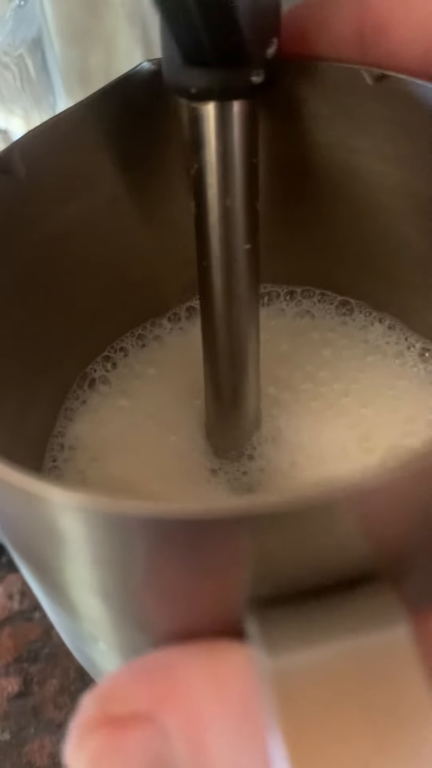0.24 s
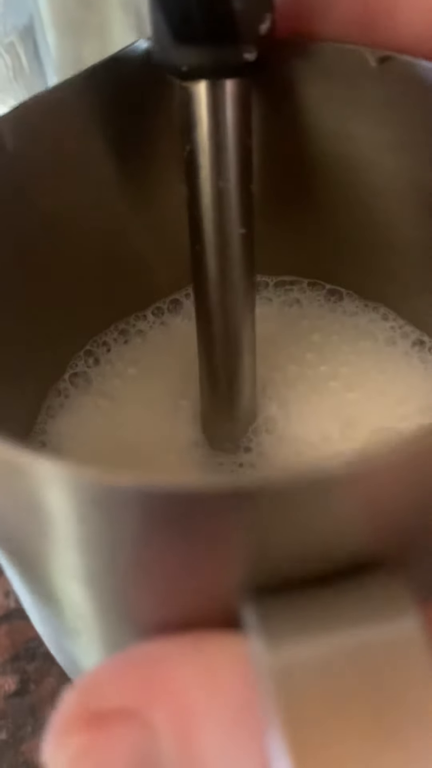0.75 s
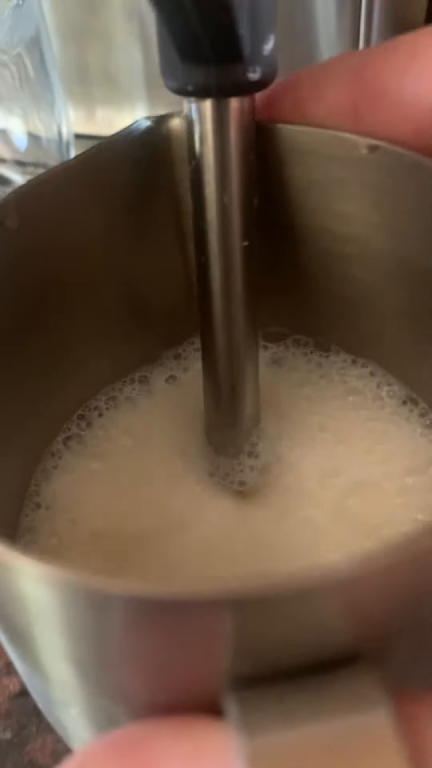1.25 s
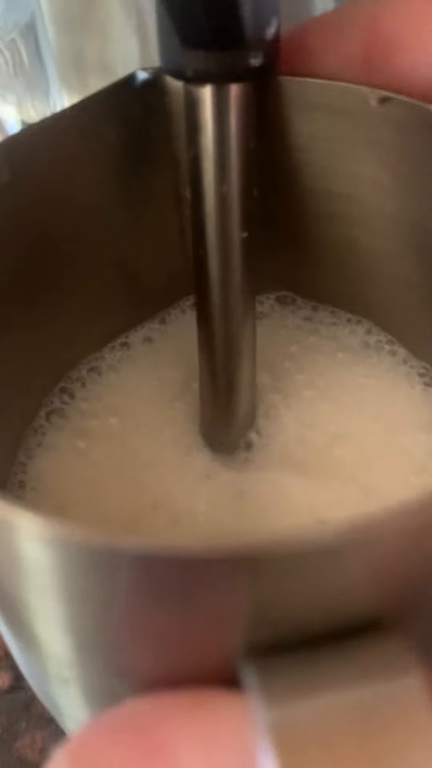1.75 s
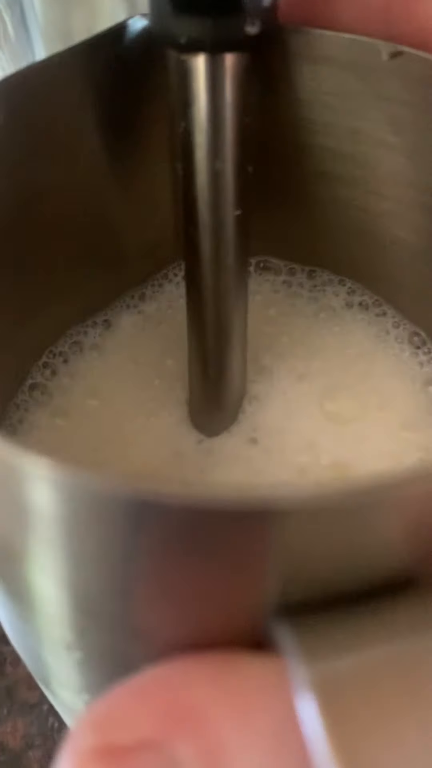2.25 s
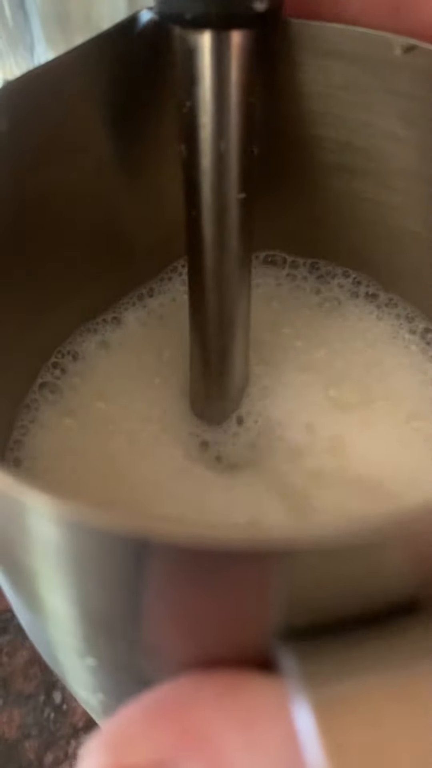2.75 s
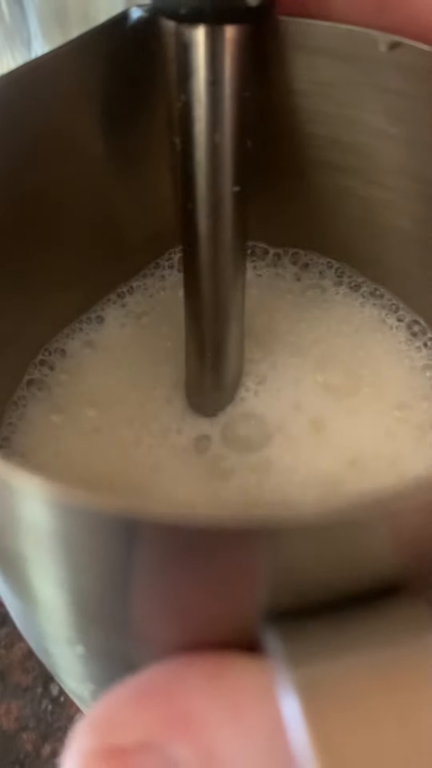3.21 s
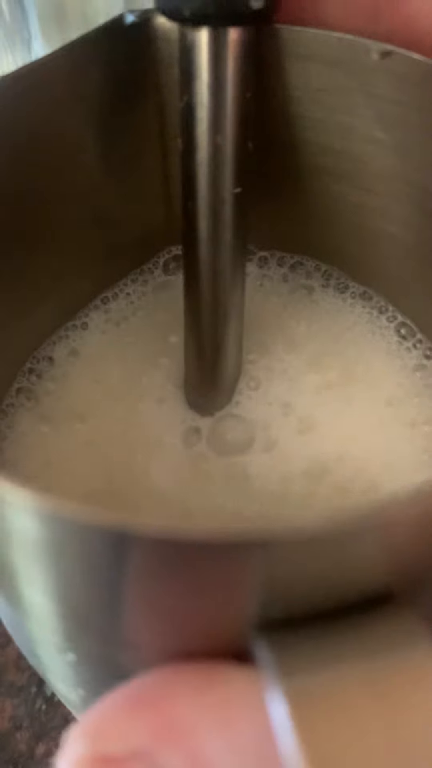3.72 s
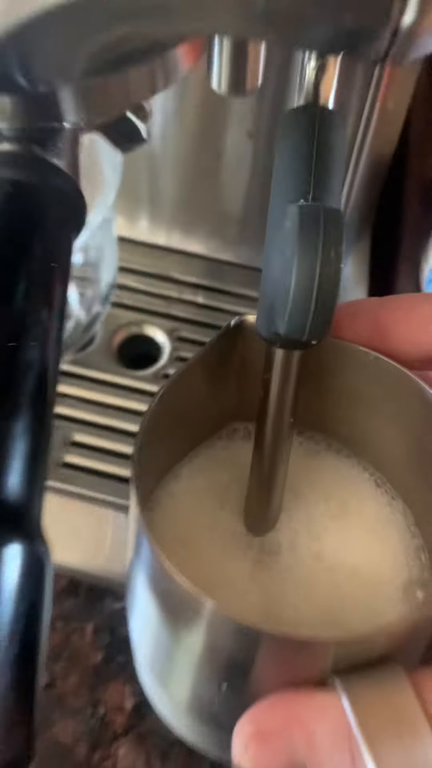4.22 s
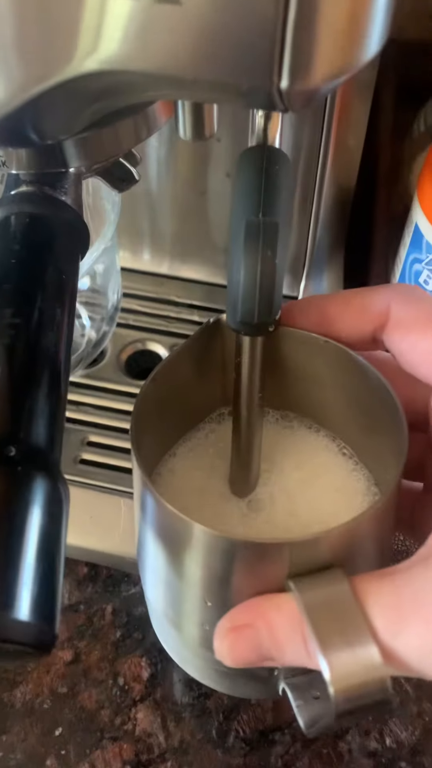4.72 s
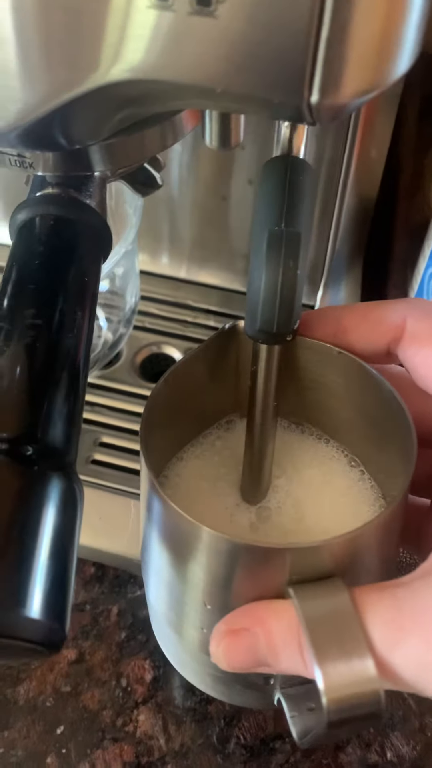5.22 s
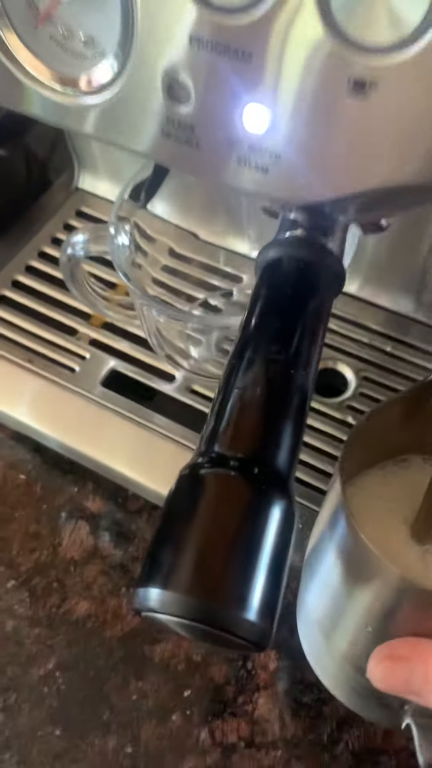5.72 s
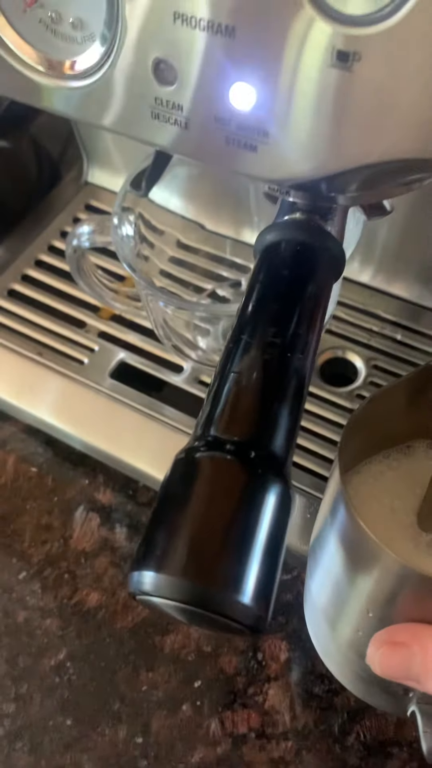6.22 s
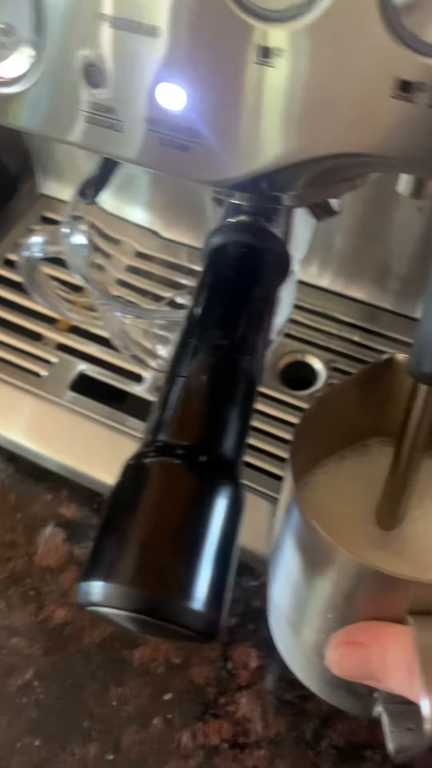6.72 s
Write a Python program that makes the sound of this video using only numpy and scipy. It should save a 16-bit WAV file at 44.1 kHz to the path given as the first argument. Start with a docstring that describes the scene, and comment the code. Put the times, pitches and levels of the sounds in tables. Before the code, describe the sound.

Very close over a steel jug, steam hisses into milk. Harsh, bright tearing bursts come in the first second and a half, with hollow churning, bubble pops and low gulps. A calmer simmer follows, then another rip just before three seconds. Around four seconds the microphone pulls back into the small kitchen; the hiss thins and wavers, while the machine's pump thuds about twice a second.

```python
"""A steam wand froths milk in a steel jug: random clicks ring the jug's colours and noise makes the hiss.
When the tip breaks the surface, bright noise tears in air; tones that slide and die are pops and gulps.
Tiny clicks fizz over the foam, while decaying modes make the machine's pump thump about twice a second.
At about four seconds the microphone draws back from the jug: near colours fade to far ones, the room grows."""
import sys
import numpy as np
from scipy import signal
from scipy.fft import rfft, irfft, next_fast_len
from scipy.io import wavfile
from scipy.ndimage import uniform_filter1d

SR = 44100
rng = np.random.default_rng(int(sys.argv[2]) if len(sys.argv) > 2 else 0)


def store_wav(level_fs):
    """Save 16-bit WAV to argv[1]."""
    pcm = np.round(np.clip(np.atleast_2d(level_fs), -1, 1) * 32767)
    wavfile.write(sys.argv[1], SR, pcm.T.astype(np.int16))


N = 306759
TIME = np.arange(N) / SR

# the tip breaks or skims the surface: (start [s], length [s], build-up [s], tearing air [dB],
# churning [dB], brightness [dB per octave], sag of the milk's ring [octaves])
SURFACE_BREAKS = [(0.015, 0.014, 0.029, -31, -28.5, 5, 0), (0.053, 0.335, .02, -46, -47, -9.5, 0.0026),
                  (0.413, .078, 0.012, -24, -20, 5, 0.0036), (0.501, 0.17, .03, -28.5, -20.5, 10, 0.012),
                  (0.881, 0.13, 0.043, -51.5, -50, -5.5, 0),
                  (1.211, 0.07, 0.082, -21.5, -15.5, 15.5, 0.025),
                  (1.285, .02, .02, -42, -21.5, 10, 0.0037), (1.35, 0.02, 0.02, -31.5, -21.5, 10, 0.0033),
                  (1.385, 0.112, 0.04, -19.5, -15.5, 10.5, 0.18), (2.418, 0.12, .06, -60, -45, -26, 0.0017),
                  (2.782, 0.115, 0.1, -24, -12, -3.5, 0.14)]
# steady jet under the foam: (time [s], hiss level [dB])
JET_LEVEL = [(0, -44.5), (.4, -47), (.8, -48.5), (1.2, -38), (1.66, -45.5), (2.26, -52), (2.45, -46),
             (2.96, -47.5), (3.3, -47), (4.08, -46), (4.48, -58), (4.88, -49.5), (5.08, -57.5),
             (5.42, -50.5), (5.78, -59), (6, -51.5), (6.38, -59), (6.8, -51), (6.94, -56.5)]
# microphone position: (time [s], distance [0 over the jug to 1 drawn back])
MIC_AWAY = [(0, 0.039), (3.85, 0.074), (4.3, 0.87), (6.96, 1)]
# colour of wildly churning milk: (frequency [Hz], density [dB per Hz])
BOIL_COLOUR = [(30, -61), (100, -35.5), (180, -30), (260, -5), (400, -14), (510, -20), (660, -0.5),
               (850, 3), (1200, 0), (1550, -9), (2300, -21), (5000, -52)]

# the milk and the air heave up by this much over a break's build-up time
BUILD_UP_DB, TEAR_OPEN_DB_PER_S = 9.5, 1492.5
# the pump fires short runs of mains-rate strokes; no two runs are quite alike
MAINS_HZ, PUMP_RUNS_S = 60, np.arange(.2475, TIME[-1], .5166)
PUMP_DETUNE, PUMP_UNEVEN_DB = .025, 1.6  # random spread: share of pitch, level


def amp(db):
    """Decibels to gain."""
    return 10 ** (np.asarray(db) / 20)


def unit(x):
    """Scales to rms 1."""
    return x / np.sqrt(np.mean(x ** 2) + 1e-20)


def read(points, hz, axis=1):
    """One column of a table, on a log-frequency axis."""
    columns = np.transpose(points)
    return np.interp(np.log(hz + 1), np.log(columns[0] + 1), columns[axis])


def curve(rows, axis=1):
    """One column of a table, at every sample."""
    columns = np.transpose(rows)
    return np.interp(TIME, columns[0], columns[axis])


def add(mix, s, sound):
    """Mixes a sound in at s seconds."""
    part = mix[max(round(s * SR), 0):][:len(sound)]
    part += sound[:len(part)]


def colour(x, spectrum, size=4096):
    """Minimum-phase filter of energy 1: each click rings causally with the spectrum."""
    log_gain = np.log(amp(read(spectrum, abs(np.fft.fftfreq(size, 1 / SR)))))
    ring = np.fft.ifft(np.exp(np.conj(signal.hilbert(log_gain)))).real[:size // 2]
    return signal.oaconvolve(x, ring / np.linalg.norm(ring))[:len(x)]


def flutter(rate_hz):
    """Random wavering of rms 1 around a rate."""
    size = next_fast_len(N, True)
    u = np.fft.rfftfreq(size, 1 / SR) / rate_hz
    spectrum = rfft(rng.standard_normal(size)) * u / (1 + u ** 2) ** 2
    return unit(irfft(spectrum, size)[:N])


def clicks(per_s, spread_db):
    """A random train of clicks of either sign, a few much larger than the rest where the spread is wide."""
    size = amp(spread_db * np.minimum(rng.exponential(1, N), 4))
    sign = rng.choice([-1, 1], N)
    return unit(size * sign * (rng.random(N) < per_s / SR))


def swell(start, length, rise_db_per_s, fall_db_per_s):
    """A gain that rises to 1 at start, holds and dies away, in straight lines of decibels."""
    before_db = rise_db_per_s * np.maximum(start - TIME, 0)
    after_db = fall_db_per_s * np.maximum(TIME - start - length, 0)
    return amp(-np.minimum(before_db + after_db, 200))


def patchy(x, depth_db):
    """Random patches, some 800 Hz by 30 ms, swell and fade in a hiss and shift its colour."""
    z = signal.stft(x, SR, nperseg=512)[2]
    across_pitch = uniform_filter1d(rng.standard_normal(z.shape), size=9, axis=0)
    field = unit(uniform_filter1d(across_pitch, size=5, axis=1))
    return signal.istft(z * amp(depth_db * field), SR, nperseg=512)[1][:N]


def bubble(hz, rise_s, t60, glide, size=8000):
    """A bubble swells into a tone that slides and dies; returns the tone and its envelope."""
    t = np.arange(size) / SR
    shape = (1 - np.exp(-(t / rise_s) ** 2)) * amp(-60 * t / t60)
    shape /= shape.max()
    turns = np.cumsum(hz * (1 + glide * np.minimum(t / t60, 1))) / SR
    return shape * np.sin(2 * np.pi * (turns + rng.random())), shape


def steam_db(lead_db=-3.5, sag_db_per_s=24, settle_db_per_s=322):
    """How hard the milk churns: steady steam, and a heave that builds up and jumps as the surface breaks."""
    # steam condensing under the milk: (time [s], churning level [dB])
    steady_steam = [(0, -39.5), (1.7, -39), (2.5, -31.5), (3.08, -44.5), (3.3, -33), (3.55, -37),
                    (3.9, -24), (4.18, -28.5), (4.26, -34.5), (4.7, -52.5), (4.9, -40.5), (5.1, -46),
                    (5.42, -31.5), (5.76, -47.5), (6.02, -38), (6.34, -52), (6.66, -38), (6.94, -50)]
    level = amp(curve(steady_steam))
    for start, length, build_s, air_db, churn_db, *_ in SURFACE_BREAKS:
        sag_db = sag_db_per_s * np.clip(TIME - start, 0, length)  # sags while the tear is open
        lead = amp(lead_db) * swell(start, length, BUILD_UP_DB / build_s, settle_db_per_s)
        heave = np.maximum(lead, swell(start, length, TEAR_OPEN_DB_PER_S, settle_db_per_s))
        level = np.maximum(level, amp(churn_db - sag_db) * heave)
    return 20 * np.log10(level)


def tear(start, length, build_s, air_db, shut_db_per_s=1000, spray_db=-16, spray_fade_db_per_s=258.5):
    """Gain of one break's air: the tear opens and shuts quickly, a thin spray leads up to it and lingers."""
    spray = amp(spray_db) * swell(start, length, BUILD_UP_DB / build_s, spray_fade_db_per_s)
    opened = swell(start, length, TEAR_OPEN_DB_PER_S, shut_db_per_s)
    return amp(air_db) * np.maximum(opened, spray)


def jet_db(bare_db=-13):
    """Level of the jet's fizz, louder wherever a break lays it bare; bare_db is against the tearing air."""
    bare = amp(bare_db) * sum(tear(*row[:4]) for row in SURFACE_BREAKS)
    return 20 * np.log10(np.hypot(amp(curve(JET_LEVEL)), bare))


def hollow(x, close_s=0.064):
    """The jet digs a hollow in the milk: as it grows, the sound is played slower and drops in pitch."""
    sag_oct = np.zeros(N)
    for start, length, *_, octaves in SURFACE_BREAKS:
        growth = np.clip((TIME - start) / length, 0, 1)
        closing = np.exp(-np.maximum(TIME - start - length, 0) / close_s)
        sag_oct += octaves * growth * closing
    return np.interp(np.cumsum(2 ** -sag_oct), np.arange(N), x)


def bubbles(per_s=9, cycles=16, count=24):
    """Small bubbles of many sizes, each a brief tone, born at random; per_s counts each size."""
    out = np.zeros(N)
    for hz in np.geomspace(230, 1900, count):
        tone = unit(bubble(hz, rise_s=2 / hz, t60=cycles / hz, glide=0.026)[0])
        out += signal.oaconvolve(clicks(per_s, spread_db=5.0), tone)[:N]
    return unit(out)


def churn(calm_db=1, boil_db=-1.0, far_db=1.0, tones_db=-5, clump_db=0.15, lump_db=2,
          boil_from_db=-30, boil_span_db=9):
    """Clumps of collapsing bubbles ring the jug; the ring widens and drops as the milk boils up."""
    # the jug's ring at a simmer, close by: (frequency [Hz], density [dB per Hz])
    simmer_near = [(100, -70), (190, -23.5), (255, -5), (330, -15), (420, -22), (510, -25), (620, -10),
                   (750, -8), (880, 2), (970, 2), (1130, -5), (1280, -5), (1500, -11), (2300, -18.5),
                   (5000, -75)]
    # the jug's ring heard from further off: (frequency [Hz], density [dB per Hz])
    simmer_far = [(130, -50), (260, -18), (400, -36), (540, -19), (670, -8), (770, -9), (870, 3), (990, 5),
                  (1110, -12), (1230, -6), (1480, -15), (1680, -5), (1830, -13), (2060, -11), (2500, -45)]
    level_db, away = steam_db(), curve(MIC_AWAY)
    crackle = clicks(per_s=3200, spread_db=4.0)
    tones = bubbles(per_s=55, cycles=36.0)

    def ring(jug):
        return unit(unit(colour(crackle, jug)) + amp(tones_db) * unit(colour(tones, jug)))

    clumps = unit(amp(clump_db * flutter(rate_hz=120) + lump_db * flutter(rate_hz=9.5)))
    boil = np.clip((level_db - boil_from_db) / boil_span_db, 0, 1)
    calm = (1 - boil) * amp(calm_db) * ring(simmer_near)
    wild = boil * amp(boil_db) * hollow(ring(BOIL_COLOUR))
    far = amp(far_db) * ring(simmer_far)
    return amp(level_db) * clumps * ((1 - away) * (calm + wild) + away * far)


def hiss(near_db=5, far_db=5, rim_db=1.5, flicker_db=2.0):
    """The jet under the foam fizzes as flickering noise; its treble beams out of the jug's mouth."""
    # hiss over the jug: (frequency [Hz], density [dB per Hz])
    hiss_near = [(500, -15), (1400, 6), (2000, 0), (2350, -6), (2750, 4), (3400, 1), (3900, 5), (4700, 2),
                 (5250, 0), (6100, -20), (6500, -6), (6900, -1), (7400, -11), (8200, -16), (9100, -12),
                 (10300, -24), (14000, -55)]
    # hiss from further off: (frequency [Hz], density [dB per Hz])
    hiss_far = [(500, -15), (1100, -9), (1300, 3), (1480, -1), (1680, 8), (1850, -1), (2060, 2), (2330, -7),
                (3050, 4), (3300, 4.5), (3950, 6), (4750, -8), (5300, -7), (6200, -16), (6680, -6),
                (7200, -24), (9300, -11), (14000, -70)]
    # band that brightens as the microphone crosses the jug's rim: (frequency [Hz], density [dB per Hz])
    rim_band = [(800, -51), (1700, 3), (2700, 22.5), (3500, 7), (4400, 0.5), (7000, -19.5)]
    fizz = unit(rng.standard_normal(N) + clicks(per_s=1500, spread_db=0.0))
    drive = fizz * amp(jet_db() + flicker_db * flutter(rate_hz=5.9))
    away = curve(MIC_AWAY)
    near = (1 - away) * amp(near_db) * colour(drive, hiss_near)
    far = away * amp(far_db) * colour(drive, hiss_far)
    rim = np.sin(np.pi * away) * amp(rim_db) * colour(drive, rim_band)  # strongest halfway
    return near + far + rim


def tearing(level_db=2.0, sputter_db=1.04, surge_db=2.7, pivot_hz=11000):
    """The bare jet drags air into the milk: a sputtering hiss, each break with its own brightness."""
    # torn air before each break's tilt: (frequency [Hz], density [dB per Hz])
    torn_air = [(40, -81.5), (1200, -20), (3000, -21), (3900, -7), (5000, 4), (5900, -11), (6700, 1),
                (7600, -7), (9000, 3), (10200, -4.5), (11200, -2), (13200, -4.5), (14300, -20.5),
                (15700, -9.5)]
    fizz = unit(rng.standard_normal(N) + clicks(per_s=1000, spread_db=1.5))
    jet = fizz * amp(level_db + sputter_db * flutter(rate_hz=96) + surge_db * flutter(rate_hz=14))
    out = np.zeros(N)
    for s, length, build_s, air_db, churn_db, tilt_db, sag_oct in SURFACE_BREAKS:
        # the tilt stops two octaves below the pivot
        tilted = [(hz, db + tilt_db * np.log2(max(hz / pivot_hz, 1 / 4))) for hz, db in torn_air]
        out += colour(jet * tear(s, length, build_s, air_db), tilted)
    return out


def blurts(per_s=66, over_db=4, spread_db=5.0, pitch_hz=935, spread_oct=0.22, t60=0.016,
           splash_db=-9, count=800):
    """Lesser collapses at random, stronger as the milk churns harder: rows like those of the large ones."""
    gap, size, pitch = rng.random((count, 3)).T
    times = np.cumsum((.2 + 1.6 * gap) / per_s)
    levels_db = np.interp(times, TIME, steam_db()) + over_db + spread_db * (2 * size - 1)
    pitches_hz = pitch_hz * 2 ** (spread_oct * (2 * pitch - 1))
    rows = zip(times, levels_db, pitches_hz)
    return [(*row, t60, splash_db) for row in rows if row[0] < TIME[-1]]


def pops(tone_db=-5, rise_s=0.0039, rise_share=0.23, lead_s=0.0023):
    """Bubbles swell and collapse with a few cycles of rising tone and a splash of noise."""
    # large steam bubbles collapsing: (time [s], relative level [dB], starting pitch [Hz],
    # ring t60 [s], splash against the tone [dB])
    collapses = [(0.019, -13, 755, 0.062, -14), (0.176, -21.5, 776, 0.033, -6),
                 (0.415, -11, 767, 0.26, -26), (0.452, -7, 715, 0.11, -16), (0.544, -16, 786, 0.035, -15),
                 (0.474, -10, 719, 0.036, -17), (0.652, -8.5, 697, 0.045, -17),
                 (0.700, -19, 950, 0.014, -20), (0.849, -15, 886, 0.0087, -16), (1.048, -15, 863, 0.018, 1),
                 (1.142, -14.5, 870, 0.013, 0.5), (1.189, -4, 850, 0.013, -23),
                 (1.216, -2, 764, 0.031, -35), (1.239, -8, 836, 0.036, -16), (1.256, -6, 772, 0.11, -19),
                 (1.295, -8.5, 900, 0.074, -13), (1.366, 2.5, 936, 0.026, -25),
                 (1.413, -4, 592, 0.025, -10), (1.596, -22.5, 905, 0.024, 3.5),
                 (1.622, -15.5, 816, 0.034, -10), (1.916, -15, 930, 0.016, -4),
                 (2.237, -10, 935, 0.016, -8), (2.444, -17.5, 960, 0.07, 0), (2.481, -11, 914, 0.011, -1),
                 (2.675, -1.5, 934, 0.013, -10), (2.751, -1, 750, 0.012, -25), (2.763, 1.5, 800, .008, -9),
                 (2.785, -0.5, 910, 0.02, -14.5), (2.811, -1, 707, 0.025, -24),
                 (2.861, -15.5, 910, 0.019, 6.5), (2.914, -12, 580, 0.013, -30),
                 (2.968, -4.5, 848, 0.029, -26), (2.987, -19, 619, 0.029, 0),
                 (3.031, -15.5, 854, 0.018, -6), (3.084, -18.5, 948, 0.05, 2.5),
                 (3.141, -24, 960, 0.012, 3.5), (3.165, -17, 894, 0.024, -18.5),
                 (3.655, -14, 846, 0.022, -17), (3.725, -12.5, 930, 0.016, -21),
                 (3.855, -11.5, 880, 0.023, -7.5), (3.872, -9, 870, 0.02, -9), (3.905, -8, 850, 0.009, -14),
                 (3.931, -18, 847, 0.031, -3), (4.015, -7, 810, 0.042, -7), (4.098, -8, 833, 0.03, -9),
                 (4.160, -9.5, 883, 0.024, -18), (4.183, -15, 810, 0.044, -21),
                 (4.217, -1.5, 904, 0.015, -13), (5.355, -24, 1000, 0.015, 2), (5.403, -15, 860, 0.012, -3),
                 (5.446, -8, 914, 0.019, -14), (5.536, -16.5, 874, 0.024, -6),
                 (5.612, -18.5, 863, 0.026, -7.5), (6.04, -17, 930, 0.05, -15),
                 (6.078, -21, 890, 0.015, -9), (6.708, -24, 900, 0.016, -1)]
    # splash of a collapsing bubble: (frequency [Hz], density [dB per Hz])
    splash_colour = [(60, -57), (250, -15), (500, -9), (850, 10), (1200, 4), (1650, -3), (2600, -11),
                     (6000, -42), (12000, -68)]
    out, splash = np.zeros((2, N))
    for s, db, hz, t60, splash_db in list(collapses) + blurts():
        # the briefest bubbles also swell fastest; each starts to swell lead_s ahead of its time
        tone, shape = bubble(hz, min(rise_s, t60 * rise_share), t60, glide=0.12)
        add(out, s - lead_s, amp(db + tone_db) * tone)
        add(splash, s - lead_s, amp(db + tone_db + splash_db) * shape)
    return out + colour(splash * rng.standard_normal(N), splash_colour)


def gulps(tone_db=-6.0, slosh_db=-13):
    """Swallowed pockets of air ring low, sag in pitch and stir the milk."""
    # air pockets swallowed by the milk: (time [s], relative level [dB], starting pitch [Hz])
    air_pockets = [(0.019, -20.5, 312), (0.412, -17.5, 300), (0.447, -11.5, 270.6), (0.472, -10.5, 287),
                   (0.493, -17, 260), (0.623, -22, 258), (1.213, -15.5, 253), (1.246, -15, 258),
                   (1.415, -12, 269), (1.448, -11, 228.6), (1.483, -22.5, 174), (2.763, -12.5, 252),
                   (2.816, -7, 247.6), (2.859, -16, 194), (2.889, -14, 229), (2.921, -15, 218),
                   (2.965, -13, 248), (3.01, -24.5, 232), (3.468, -30, 243), (4.009, -17, 253.6),
                   (5.531, -36.5, 210)]
    out, slosh = np.zeros((2, N))
    for s, db, hz in air_pockets:
        tone, shape = bubble(hz, rise_s=0.0058, t60=0.095, glide=-0.12)
        add(out, s, amp(db + tone_db) * tone)
        add(slosh, s, amp(db + slosh_db) * shape)
    return out + colour(slosh * rng.standard_normal(N), BOIL_COLOUR)


def spits(level_db=3, rise_share=0.26, size=4000):
    """Surface bubbles burst with bright ticks and short crackles of decaying noise."""
    # foam bubbles bursting: (time [s], relative level [dB], t60 [s])
    bursts = [(3.462, -30, 0.017), (3.851, -24, 0.026), (3.983, -13.5, 0.05), (4.006, -16.5, 0.061),
              (4.042, -10, 0.027), (4.053, -16.5, .02), (4.130, -30, .015), (4.211, -20.5, 0.024),
              (5.402, -18, .02), (5.516, -36, .008), (5.535, -22.5, 0.0074), (6.039, -22.5, 0.013),
              (6.701, -22, 0.034)]
    # crackle of a surface bubble: (frequency [Hz], density [dB per Hz])
    crackle_colour = [(100, -65), (600, 27), (1600, 7.5), (3500, 13.5), (6000, -14), (9000, 7), (12500, -2),
                      (15500, -16)]
    out, t = np.zeros(N), np.arange(size) / SR
    for s, db, t60 in bursts:
        rise = 1 - np.exp(-t / (rise_share * t60))
        add(out, s, amp(db + level_db - 60 * t / t60) * rise)
    return colour(out * rng.standard_normal(N), crackle_colour)


def splutter(ring_s=0.0025, size=800):
    """Bubbles split the foam in short, irregular cracks of noise that follow the steady jet."""
    # crack of a bubble splitting the foam: (frequency [Hz], density [dB per Hz])
    crack_colour = [(400, -8), (900, 12), (1600, -5), (2400, -1.5), (3800, 9), (5200, -26.5), (6800, -32.5),
                    (9000, -19), (14000, -49.5)]
    train = abs(clicks(per_s=75, spread_db=2.8))
    bursts = signal.oaconvolve(train, np.exp(-np.arange(size) / SR / ring_s))[:N]
    cracks = unit(bursts * rng.standard_normal(N))
    return colour(amp(curve(JET_LEVEL)) * cracks, crack_colour)


def foam(level_db=-6.5, away_db=-6):
    """Countless tiny bubbles burst across the surface, unrelated left and right; they follow the jet."""
    # fizz from all over the foam: (frequency [Hz], density [dB per Hz])
    fizz_colour = [(300, 6.5), (900, -25), (1600, -19), (2300, -19), (3200, -8.5), (4200, 10), (5100, -4),
                   (6200, 1), (7500, -26), (10000, -55), (14000, -53)]
    gain = amp(jet_db() + level_db + away_db * curve(MIC_AWAY))  # fades with distance
    return np.array([colour(gain * clicks(per_s=11000, spread_db=2.0), fizz_colour) for channel in range(2)])


def pump(ring_oct=.3):
    """Runs of piston strokes rock the chassis and, through rubber mounts, rattle the housing unevenly."""
    # the machine's modes, chassis first: (frequency [Hz], level [dB], t60 [s])
    modes = [(63, -33.5, 0.37), (120, -48.5, 0.28), (232.1, -39, 0.11), (272.3, -24, 0.034),
             (306.3, -44, 0.31), (379, -34.5, 0.056), (474, -32, 0.025)]
    # strokes of one run: (push on the chassis [dB], rattle of the housing [dB])
    run_strokes = [(-27.5, 1.5), (5, 6), (-3.5, -22), (-3, -13.5)]
    t, out = np.arange(SR // 2) / SR, np.zeros(N)
    onset = np.sin(np.pi / 2 * np.minimum(2 * t * MAINS_HZ, 1)) ** 2  # rises over half a mains cycle
    hz, db, t60 = np.transpose(modes)[:, :, None]
    chassis = onset * amp(db[0] - 60 * t / t60[0]) * np.sin(2 * np.pi * hz[0] * t)
    for start in PUMP_RUNS_S:
        detune, ring = rng.standard_normal((2, len(modes) - 1, 1))
        decay = amp(db[1:] - 60 * t / (t60[1:] * 2 ** (ring_oct * ring)))
        panels = onset * decay * np.sin(2 * np.pi * hz[1:] * (1 + PUMP_DETUNE * detune) * t)
        for k, (push_db, rattle_db) in enumerate(run_strokes):
            uneven_db = PUMP_UNEVEN_DB * rng.standard_normal(len(panels))
            rattle = amp(rattle_db + uneven_db) @ panels
            add(out, start + k / MAINS_HZ, rattle + amp(push_db) * chassis)
    return out


def clatter(level_db=-42, length_s=0.031, rise_db_per_s=1000, fall_db_per_s=300, beat=0.57):
    """Loose parts of the housing clatter as random clicks that beat at the mains rate in each run."""
    # loose parts of the housing: (frequency [Hz], density [dB per Hz])
    loose_parts = [(60, -25.5), (150, -9), (230, 1.5), (330, 0.5), (430, -2), (520, -11), (800, -28.5),
                   (2500, -32), (6000, -62.5)]
    # each burst of clatter is full from the second stroke on
    runs = sum(swell(start + 1 / MAINS_HZ, length_s, rise_db_per_s, fall_db_per_s) for start in PUMP_RUNS_S)
    strokes = 1 + beat * np.cos(2 * np.pi * MAINS_HZ * TIME)
    return colour(amp(level_db) * runs * strokes * clicks(per_s=900, spread_db=1.5), loose_parts)


def valve():
    """The pump's valve hums for a moment in each run, sliding down in pitch."""
    # hum of one run: (delay after the run starts [s], length [s], mean level [dB],
    # mean starting pitch [Hz], glide [octaves])
    hum = (.022, .046, -37, 322, -.15)
    delay_s, length_s, db, hz, glide_oct = hum
    u, out = np.arange(0, 1, 1 / (length_s * SR)), np.zeros(N)  # u is the share of the hum gone by
    for start in PUMP_RUNS_S:
        detune, size = rng.standard_normal(2)
        turns = np.cumsum(hz * (1 + PUMP_DETUNE * detune) * 2 ** (glide_oct * u)) / SR
        level = amp(db + PUMP_UNEVEN_DB * size)
        add(out, start + delay_s, level * np.sin(np.pi * u) * np.sin(2 * np.pi * turns))
    return out


def rumble(waver_db=2):
    """Low, wavering noise of the machine and the room, fainter as the microphone draws back."""
    # rumble: (frequency [Hz], density [dB per Hz])
    rumble_colour = [(20, -44.5), (45, 6), (65, 1.5), (85, 10), (105, 4.5), (150, -10), (270, -5),
                     (450, -15), (1500, -40), (8000, -46.5)]
    level_db = np.interp(curve(MIC_AWAY), [0, 1], [-53, -55.5])
    return amp(level_db + waver_db * flutter(rate_hz=7.2)) * colour(rng.standard_normal(N), rumble_colour)


def stereo_image(x):
    """Gives the left and right channels a phase and balance at each pitch; some change with distance."""
    # left against right: (frequency [Hz], phase near [rad], phase away [rad],
    # balance near [dB], balance away [dB])
    left_right = [(60, 0, 0, -1.5, -1.5), (280, -.45, -.8, -2.3, -1.3), (550, -.35, -2.6, 0, -.5),
                  (740, -1.2, -3.0, -2, -1), (940, -2.6, -3.0, -9.5, -4.3), (1120, -3.6, -3.25, -3, 0),
                  (1450, -4.7, -4.7, -.5, 0), (1800, -5.7, -5.0, 2, 0), (2150, -5.0, -4.7, 5.5, -3),
                  (2450, -6.6, -3.8, 3, 0), (2680, -9.3, -3.9, -1.5, -.5), (2900, -9.6, -6, -2, -3.5),
                  (3150, -9.9, -9.2, -4, -.5), (3900, -11, -10.8, 0, 0), (4800, -9.45, -9.45, 0, 0),
                  (5800, -9.4, -9.4, 0, 0), (6400, -6.3, -6.8, 0, 0), (7400, -6.2, -6.2, 0, 0),
                  (9500, -3.3, -3.3, 0, 0), (10400, -3, -3, 0, 0), (11800, 0, 0, 0, 0),
                  (13400, .1, .1, 0, 0), (14200, 3.1, 3.1, 0, 0)]
    hz, t, z = signal.stft(x, SR, nperseg=1024, noverlap=768)
    away = np.interp(t, *np.transpose(MIC_AWAY))

    def blend(near_column, away_column):
        near = np.outer(read(left_right, hz, axis=near_column), 1 - away)
        return near + np.outer(read(left_right, hz, axis=away_column), away)

    phase, lean_db = blend(1, 2), blend(3, 4)
    pair = np.array([z * amp(lean_db / 2) * np.exp(1j * phase), z * amp(-lean_db / 2)])
    return signal.istft(pair, SR, nperseg=1024, noverlap=768)[1][:, :N]


def kitchen(x, size=16384, count=6, drift_s=0.11):
    """Short diffuse tails of the steel front and room, unlike left and right, drift as jug and mic sway."""
    # how much of the room is heard at each pitch: (frequency [Hz], level [dB])
    diffuse = [(150, -12), (290, -7), (450, 2), (650, -3), (900, -5), (1300, -5), (2300, 5), (4000, 5),
               (5300, -3), (7000, 3), (10000, -3), (12000, 3), (14000, 0)]
    # how long the room rings: (frequency [Hz], t60 [s])
    decay_times = [(200, 0.24), (1000, 0.14), (4000, 0.012), (14000, 0.004)]
    hz, t, z = signal.stft(rng.standard_normal((count, 2, size)), SR)
    decay_db = read(diffuse, hz)[:, None] - 60 * t / read(decay_times, hz)[:, None]
    tails = signal.istft(z * amp(decay_db), SR)[1]
    out = np.zeros((2, N))
    for k, tail in enumerate(tails):
        # the tails take turns, each fading over into the next
        share = np.sin(np.pi / 2 * np.minimum((TIME / drift_s - k) % count, 2))
        out += signal.oaconvolve((share * x)[None], tail / np.linalg.norm(tail[0]), axes=1)[:, :N]
    return out


def scene():
    """The jug and the machine; the jug's room sound gains weight as the microphone draws back."""
    # room gain: (over the jug [dB], drawn back [dB])
    room_db = (-12, -9)
    jug = churn() + patchy(hiss(), depth_db=1.8) + patchy(tearing(), depth_db=2.6)
    jug += pops() + gulps() + spits() + splutter()
    machine = pump() + clatter() + valve() + rumble()
    room_gain = amp(np.interp(curve(MIC_AWAY), [0, 1], room_db))
    return stereo_image(jug + machine) + foam() + kitchen(jug * room_gain)


def record(dry, limit_db=-27.5, squeeze=0.11, recover_db_per_s=50.5, edge_hz=15900):
    """The recorder turns loud passages down, rounds off the tallest peaks and limits the band."""
    power_db = 10 * np.log10(abs(uniform_filter1d((dry ** 2).mean(0), size=600)) + 1e-12)
    fall_db = TIME * recover_db_per_s
    held_db = np.maximum.accumulate(power_db + fall_db) - fall_db  # peaks recover at a steady rate
    over_db = np.maximum(held_db - limit_db, 0)
    ducked = dry * amp(-squeeze * uniform_filter1d(over_db, size=300))
    rounded = ducked / (1 + (ducked / .9) ** 4) ** .25
    band_limit = signal.firwin(511, edge_hz, window=("kaiser", 9), fs=SR)
    return signal.oaconvolve(rounded, band_limit[None], "same")


dry = scene()
out = record(dry)
store_wav(out)
```